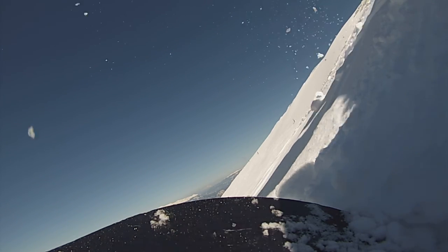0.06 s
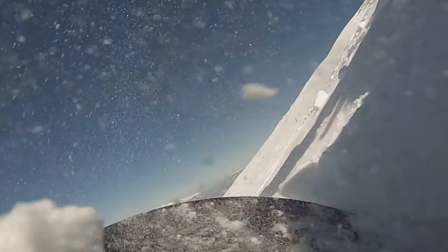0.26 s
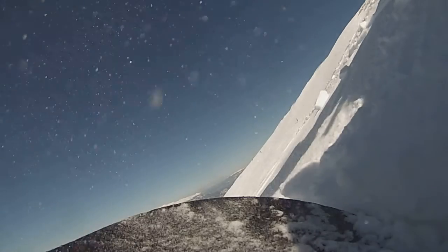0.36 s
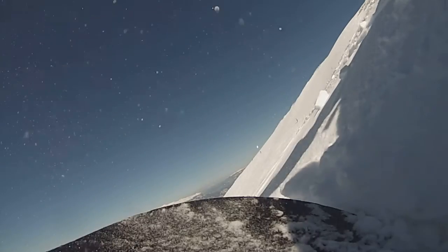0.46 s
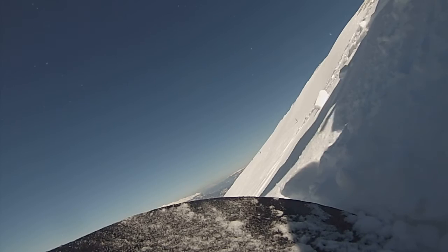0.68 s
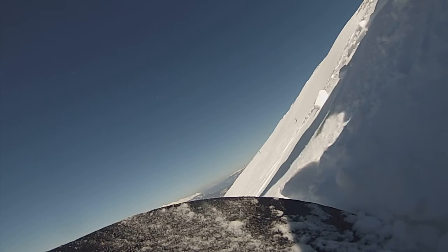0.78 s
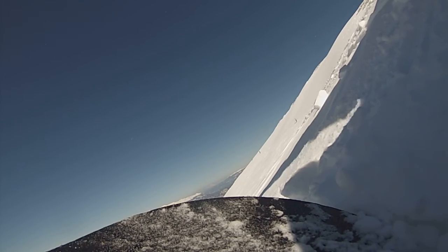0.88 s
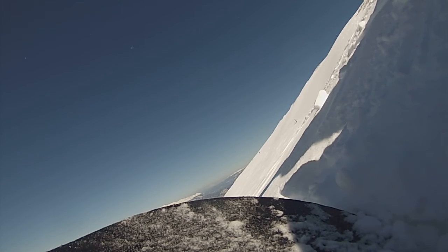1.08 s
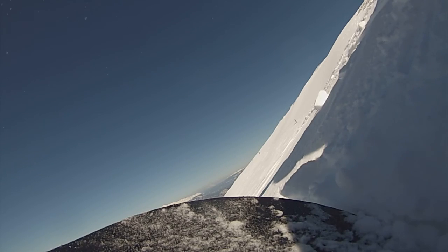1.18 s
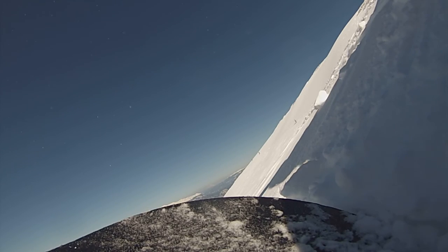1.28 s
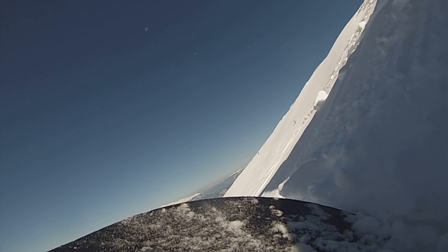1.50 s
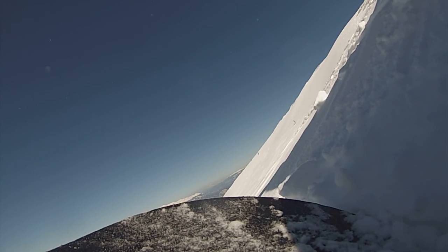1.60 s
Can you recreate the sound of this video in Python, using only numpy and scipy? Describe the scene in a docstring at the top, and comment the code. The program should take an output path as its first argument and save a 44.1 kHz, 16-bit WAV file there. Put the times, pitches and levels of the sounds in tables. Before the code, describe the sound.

A snowboard scrapes and rumbles over lumpy snow, hit once by a heavy clump.

```python
"""Snowboard on a snowy slope

Heard from a camera fixed to the deck. The board is a resonator driven by the snow: lumps knock and
tick against it, the edge scrapes through grains, and its bending modes hum. Spray, powder and ice
crystals strike the deck and housing, and air buffets the microphone. Early on, a clump slams into
the camera and overloads it."""
import sys
import numpy as np
from scipy import signal
from scipy.io import wavfile
from scipy.ndimage import uniform_filter1d

SR = 44100
rng = np.random.default_rng(int(sys.argv[2]) if len(sys.argv) > 2 else 0)


def wrap_up_sound(samples):
    """Save the sound to the file named by the first command line argument, as 16-bit audio."""
    columns = np.atleast_2d(samples).T
    # keep every value between -1 and 1, then stretch to whole-number steps
    tamed = np.clip(columns, -1, 1)
    steps = np.round(tamed * 32767).astype(np.int16)
    wavfile.write(sys.argv[1], SR, steps)


N = 72765
T = np.arange(N) / SR

# Modes of the deck and camera housing. Each row: frequency in Hz, bandwidth in Hz, relative level in dB.
DECK_MODES = [(141.6, 59, -1), (220.5, 32.6, 3), (318.6, 78, -10.5), (452.5, 99.4, -10), (755, 80, -17.5),
              (1063, 105, 1.5), (1259, 153, 5.5), (1425, 283, 2), (1778, 318, 1), (2139, 227, 4),
              (2740, 1050, 15.5), (3740, 1055, 20), (5570, 540, -1.5), (7300, 230, -13.5),
              (11800, 990, -10.5)]
# Knocks and clicks, mostly from lumps of snow; at 1.1415 s, a faint, very short, bright click.
# Each row: start in seconds, then level in dB and centre in Hz for the thud, the clack and the tick
# in turn, then decay time of the force in seconds.
KNOCKS_AND_CLICKS = [(0.0211, -35, 330, -45, 1360, -56.5, 2300, 0.0024),
                     (0.0424, -33.5, 350, -39, 1296, -59.5, 2540, 0.002),
                     (0.049, -36, 346, -42.5, 1200, -81, 2600, 0.0025),
                     (0.0828, -34, 314, -44, 1460, -67, 2600, .003),
                     (.2300, -21.5, 403, -18.5, 1200, -45, 6100, 0.0053),
                     (.2350, -8, 666, -15.5, 1600, -30, 9500, 0.0012),
                     (0.2381, -16.5, 450, -29, 1760, -45, 5600, 0.0031),
                     (0.242, -47, 450, -25, 1550, -37, 5000, 0.00094),
                     (0.2864, -42, 180, -43.5, 2000, -47.5, 5500, 0.0024),
                     (0.3005, -60, 180, -46, 1610, -48, 7700, .002),
                     (0.3081, -52, 180, -43.5, 2030, -48.5, 7700, 0.0023),
                     (.3430, -48.5, 200, -43.5, 1870, -79, 3500, 0.0033),
                     (.3580, -48.5, 202, -46.5, 1290, -65, 3500, 0.0035),
                     (.4410, -66, 220, -43, 2070, -57, 4200, 0.0045),
                     (0.469, -58.5, 280, -43, 1310, -56, 4240, 0.0034),
                     (0.522, -48, 395, -43.5, 1350, -52, 3300, 0.0037),
                     (0.5393, -63, 350, -51.5, 2040, -61.5, 5000, 0.0025),
                     (0.5556, -68, 344, -54, 2020, -68, 4210, 0.0018),
                     (.5920, -76, 250, -49, 1810, -63, 3340, 0.003),
                     (.6050, -46, 220, -64, 1310, -80, 3300, .003),
                     (.6860, -63.5, 403, -45.5, 1640, -56, 3400, 0.0064),
                     (.7400, -65, 450, -48.5, 1900, -67, 3800, 0.0031),
                     (0.764, -65, 398, -38.5, 1540, -61, 3930, 0.0026),
                     (.7800, -47, 269, -41, 2260, -50.5, 3200, 0.0019),
                     (0.8, -36.5, 324, -23, 1150, -56, 3000, 0.0018),
                     (0.8073, -43, 200, -34, 1310, -65, 4500, 0.0017),
                     (.8140, -52, 282, -32, 1620, -53.5, 4800, 0.0037),
                     (0.83, -49, 200, -39.5, 1290, -67, 3800, 0.0058),
                     (0.8401, -53, 300, -36, 1680, -51.5, 5860, 0.01),
                     (0.8518, -44.5, 294, -37.5, 1710, -73, 5000, .002),
                     (0.8693, -65, 250, -41, 1820, -60, 3800, 0.0035),
                     (.9270, -35.5, 380, -45, 1220, -78, 3000, 0.0053),
                     (.9440, -30, 393, -42.5, 1070, -81, 3000, 0.0022),
                     (.9990, -50.5, 377, -35.5, 2100, -47.5, 3600, 0.0025),
                     (1.0270, -38, 260, -28, 1260, -53, 3600, 0.0034),
                     (1.0601, -60, 320, -45.5, 1250, -59, 3400, 0.0075),
                     (1.1263, -20.5, 352, -21.5, 1458, -49, 2810, 0.0038),
                     (1.1415, -36.5, 260, -40.5, 1460, -58.5, 12100, 0.00041),
                     (1.155, -36, 198, -35.5, 1380, -55, 3200, .005),
                     (1.1639, -20.5, 229, -25.5, 1460, -41, 2550, 0.0041),
                     (1.1781, -29.5, 212, -39, 1640, -53.5, 3600, 0.0036),
                     (1.225, -37.5, 336, -46.5, 1800, -72, 3300, 0.005),
                     (1.2630, -41, 260, -40.5, 1960, -62, 3000, 0.0023),
                     (1.2687, -34, 272, -36, 1560, -67, 3000, 0.0014),
                     (1.2952, -39.5, 480, -25.5, 2460, -37.5, 2880, 0.0016),
                     (1.3210, -34, 260, -51, 1280, -79, 3000, 0.0035),
                     (1.3536, -29, 186, -35.5, 1320, -48.5, 3140, 0.0046),
                     (1.372, -35, 210, -46.5, 2160, -64, 3300, 0.0058),
                     (1.3886, -24.5, 487, -33.5, 1120, -66, 3300, .003),
                     (1.423, -58, 250, -40.5, 1530, -69, 3300, 0.0016),
                     (1.4390, -25.5, 220, -31, 1520, -53, 4200, 0.006),
                     (1.4830, -32.5, 274, -37.5, 1620, -67, 4200, 0.0052)]
# Hard hits that ring the second bending mode. Each row: start in seconds, initial level in dB.
HARD_HITS = [(1.129, -26), (1.166, -23), (1.392, -32)]
# The edge in the snow. Each row: time in seconds, then rumble, scrape and hiss in dB before their trims.
EDGE_LEVELS = [(0, -40.5, -53, -79), (.10, -48, -59.5, -66), (.17, -62, -49, -64),
               (.205, -45.5, -40.5, -61), (.225, -78, -59.5, -78), (.27, -42.5, -46, -62),
               (.37, -61, -52.5, -65.5), (.43, -57, -62, -70), (.57, -73, -60, -72.5),
               (.61, -46.5, -66.5, -77), (.66, -76, -60, -77), (.78, -59.5, -55, -71),
               (.90, -65, -62.5, -76), (.98, -49, -45.5, -68.5), (1.015, -55, -57.5, -72),
               (1.06, -46, -46, -64.5), (1.12, -68.5, -47, -63.5), (1.18, -33, -46.5, -61.5),
               (1.23, -48, -49.5, -62.5), (1.335, -48, -50.5, -65.5), (1.40, -37, -53, -68.5),
               (1.455, -32.5, -34.5, -48), (1.53, -38, -39, -55), (1.58, -59.5, -61, -71),
               (1.65, -60, -58.5, -66)]
# Hum of the lowest bending mode. Each row: time in seconds, level in dB.
BEND_LEVELS = [(0, -31), (.05, -28.5), (.15, -39.5), (.225, -48), (.28, -31.5), (.41, -36.5), (.46, -43.5),
               (.59, -59), (.612, -40.5), (.74, -57.5), (.83, -51.5), (.95, -44.5), (1.02, -46),
               (1.05, -37), (1.12, -53), (1.15, -24), (1.23, -33.5), (1.30, -28), (1.338, -52.5),
               (1.39, -24), (1.44, -35.5), (1.525, -23), (1.58, -37.5), (1.65, -54)]
# Thin hiss of the biting edge. Each row: time in seconds, level in dB.
SHEEN_LEVELS = [(0, -106), (1.05, -89), (1.17, -72.5), (1.22, -91), (1.42, -99), (1.445, -68.5),
                (1.53, -75), (1.58, -92)]
# Air buffeting the microphone. Each row: time in seconds, level in dB.
WIND_LEVELS = [(0, -78), (.08, -47), (.16, -38), (.21, -60), (.26, -37.5), (.36, -38.5), (.48, -71),
               (.9, -54), (1.07, -60), (1.17, -26), (1.25, -59.5), (1.44, -44), (1.65, -54)]
# Spray raining on the housing. Each row: time in seconds, level in dB.
SPRAY_LEVELS = [(0, -64), (.09, -77.5), (.15, -65), (.17, -65.5), (.20, -80), (.33, -74.5), (.45, -80.5),
                (.9, -87), (1.4, -74), (1.65, -75)]
# Loose crystals landing on the housing. Each row: time in seconds, level in dB.
CRYSTAL_LEVELS = [(0, -83), (.23, -89), (.28, -73), (.40, -81), (.58, -82), (.9, -80.5), (1.65, -75)]
# Dry powder sizzling along the deck. Each row: time in seconds, level in dB.
POWDER_LEVELS = [(0, -80), (.15, -87), (.22, -87), (.30, -83.5), (.48, -82), (.62, -99), (1.0, -88),
                 (1.2, -90), (1.38, -88), (1.48, -91), (1.65, -79)]

THUD_BAND_HZ, CLACK_BAND_HZ = (92, 970), (890, 2170)
TICK_BAND_HZ, HISS_BAND_HZ = (2400, 15000), (2400, 12500)
THUD_OCTAVES, CLACK_OCTAVES, TICK_OCTAVES = 0.56, 0.55, 0.71   # spread of the modes one impact excites


def knocks(rough_db=3.5, click_s=.0006, click_force=2.7, rise_share=0.39):
    """Impulsive excitation: a click and a brief grainy burst ring low, middle and high deck modes."""
    length_s, level_s = .08, .007   # a row's levels hold for the energy gathered into level_s
    out = np.zeros(N + SR)
    t = np.arange(int(length_s * SR)) / SR
    for start_s, thud_db, thud_hz, clack_db, clack_hz, tick_db, tick_hz, decay_s in KNOCKS_AND_CLICKS:
        grains, sizes = rng.standard_normal((2, SR))[:, :len(t)]
        envelope = (1 - np.exp(-t / (rise_share * decay_s))) * np.exp(-t / decay_s)
        force = rms_one(grains * from_db(rough_db * sizes)) * envelope
        force[int(click_s * SR)] += click_force
        tick_top_hz = min(2.06 * tick_hz, SR / 2 - 1)
        softened = signal.sosfilt(signal.butter(2, tick_top_hz, fs=SR, output="sos"), force)
        thud = deck(force, THUD_BAND_HZ, thud_hz, THUD_OCTAVES)
        clack = deck(force, CLACK_BAND_HZ, clack_hz, CLACK_OCTAVES)
        tick = deck(softened, TICK_BAND_HZ, tick_hz, TICK_OCTAVES)
        start = int(start_s * SR)
        for db, part in (thud_db, thud), (clack_db, clack), (tick_db, tick):
            out[start:start + len(t)] += from_db(db) * rms_one(part) * np.sqrt(level_s / length_s)
    return out[:N]


def slam(start_s=.2366, db=8.6, hz=123, t60_s=0.023):
    """A heavily damped oscillator: the clump shoves the camera, which swings briefly on its mount."""
    return damped_sine(start_s, db, hz, t60_s)


def jolts(hz=216.4, t60_s=.17):
    """Free vibration: after a hard hit, the board's second bending mode rings and dies away."""
    return sum(damped_sine(start_s, db, hz, t60_s) for start_s, db in HARD_HITS)


def bending(hz=89.8, wander=.035, flutter_db=1.3):
    """Flexural vibration: the board's lowest mode hums, its pitch wandering with the uneven load."""
    pitch_hz = hz * (1 + wander * drift(rate_hz=14.4))
    hum = np.sqrt(2) * np.sin(2 * np.pi * np.cumsum(pitch_hz) / SR)
    flutter = from_db(flutter_db * drift(rate_hz=36))
    return gains(BEND_LEVELS)[0] * hum * flutter


def edge(grains_per_s=3100, spread_db=2.5, powder_gain=0.74):
    """Forced vibration: grains breaking under the edge, over smooth powder, drive the deck's modes."""
    sizes = from_db(spread_db * np.minimum(rng.exponential(1, N), 5))
    signs = rng.choice([-1, 1], N)
    breaks = rng.random(N) < grains_per_s / SR
    force = rms_one(sizes * signs * breaks) + powder_gain * rng.standard_normal(N)
    rumble_gain, scrape_gain, hiss_gain = gains(EDGE_LEVELS)
    rumble = rumble_gain * evened(deck(force, THUD_BAND_HZ), samples=1300)
    scrape = scrape_gain * evened(deck(force, CLACK_BAND_HZ), samples=1500)
    hiss = hiss_gain * evened(deck(force, HISS_BAND_HZ), samples=1500)
    return from_db(-1.5) * rumble + from_db(-3.5) * scrape + from_db(-2.5) * hiss   # trims


def sheen(hz=7770, width_hz=400):
    """Narrow-band noise: a thin, high hiss when the edge bites hard."""
    hiss = resonance(rng.standard_normal(N), hz, width_hz)
    narrowed = resonance(hiss, hz, width_hz)
    return gains(SHEEN_LEVELS)[0] * rms_one(narrowed)


def wind(band_hz=(13, 84)):
    """Turbulence: gusts press on the microphone as low-frequency noise."""
    pressure = band(rng.standard_normal(2 * N), *band_hz)[N:]
    return gains(WIND_LEVELS)[0] * evened(pressure, samples=3000)


def spray(band_hz=(4800, 8330), rough_db=3.5):
    """Superposition of tiny impacts: fine thrown snow merges into a fizz on the housing."""
    impacts = rng.standard_normal(N) * from_db(rough_db * drift(rate_hz=300))
    fizz = band(impacts, *band_hz, order=1)
    return gains(SPRAY_LEVELS)[0] * rms_one(band(fizz, *HISS_BAND_HZ))


def crystals(per_s=130, spread_db=4, centre_hz=8880):
    """A Poisson process: single ice crystals land at random and ring the housing's high modes."""
    sizes = from_db(spread_db * np.minimum(rng.exponential(1, N), 4))
    landings = rng.random(N) < per_s / SR
    ticks = deck(sizes * landings + 1e-18, HISS_BAND_HZ, centre_hz, TICK_OCTAVES)
    return gains(CRYSTAL_LEVELS)[0] * rms_one(ticks)


def powder(band_hz=(9000, 12000), rough_db=5.5):
    """Amplitude-modulated noise: the finest grains sizzle along the deck in the top treble."""
    grains = rng.standard_normal(N) * from_db(rough_db * drift(rate_hz=400))
    return gains(POWDER_LEVELS)[0] * rms_one(band(grains, *band_hz))


def deck(force, band_hz, centre_hz=1000, octaves=np.inf):
    """Modal superposition: a force rings the modes in a band; a finite spread favours the centre."""
    out = 0
    for k, (hz, width_hz, db) in enumerate(DECK_MODES):
        if band_hz[0] < hz < band_hz[1]:
            weight = np.exp(-.5 * (np.log2(hz / centre_hz) / octaves) ** 2)
            out = out + (-1) ** k * weight * from_db(db) * resonance(force, hz, width_hz)
    return band(out, *band_hz)


def resonance(x, hz, width_hz):
    """A two-pole resonator with unit gain at its peak."""
    r = np.exp(-np.pi * width_hz / SR)
    numerator = np.array([1, 0, -1]) * (1 - r * r) / 2
    return signal.lfilter(numerator, [1, -2 * r * np.cos(2 * np.pi * hz / SR), r * r], x)


def damped_sine(start_s, db, hz, t60_s):
    """Exponential decay: a struck mode loses 60 dB in t60_s."""
    t = np.maximum(T - start_s, 0)
    return from_db(db - 60 * t / t60_s) * np.sin(2 * np.pi * hz * t)


def band(x, low_hz, high_hz, order=2):
    """Causal band-pass filtering."""
    return signal.sosfilt(signal.butter(order, [low_hz, high_hz], "band", fs=SR, output="sos"), x)


def drift(rate_hz):
    """Random fluctuation: low-passed noise of unit rms."""
    r = np.exp(-2 * np.pi * rate_hz / SR)
    return rms_one(signal.lfilter([1], [1, -2 * r, r * r], rng.standard_normal(2 * N))[N:])


def evened(x, samples):
    """Division by the running rms holds the level at 1 and keeps the fine grain."""
    return x / np.sqrt(np.abs(uniform_filter1d(x * x, samples)) + 1e-20)


def gains(rows):
    """Interpolation in dB: each level column becomes a gain per sample."""
    times, *columns = np.transpose(rows)
    return [from_db(np.interp(T, times, levels)) for levels in columns]


def rms_one(x):
    """Normalisation to unit rms."""
    return x / np.sqrt(np.mean(x ** 2) + 1e-20)


def from_db(db):
    """Decibels as an amplitude ratio."""
    return 10 ** (np.asarray(db) / 20)


def scene():
    """Free field: all sources add directly at one microphone, as the open slope returns no echo."""
    board = knocks() + jolts() + bending() + edge() + sheen()
    return (board + slam() + spray() + powder() + crystals() + wind())[None]


def record(dry, low_cut_hz=23, high_cut_hz=16800):
    """Band limiting and saturation: the deepest bass is lost, peaks flatten, and the top is cut."""
    low_cut = signal.butter(1, low_cut_hz, "high", fs=SR, output="sos")
    high_cut = signal.cheby2(12, 60, high_cut_hz, fs=SR, output="sos")
    overloaded = np.clip(signal.sosfilt(low_cut, dry), -1, 1)
    return signal.sosfilt(high_cut, overloaded)


dry = scene()
out = record(dry)
wrap_up_sound(out)
```